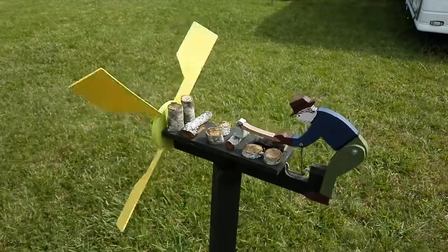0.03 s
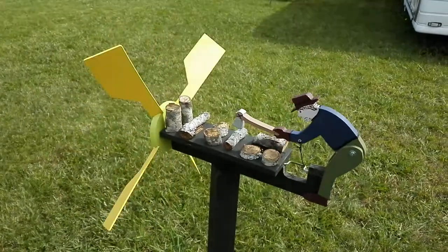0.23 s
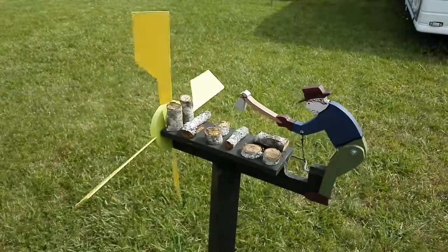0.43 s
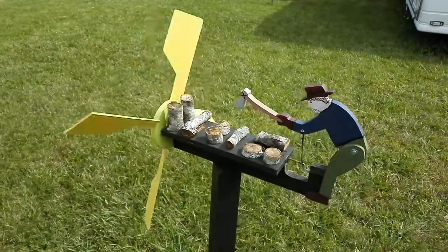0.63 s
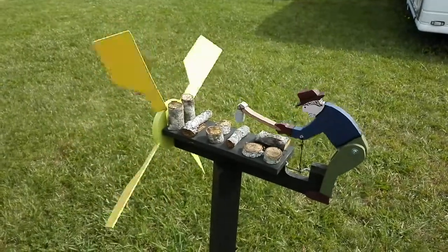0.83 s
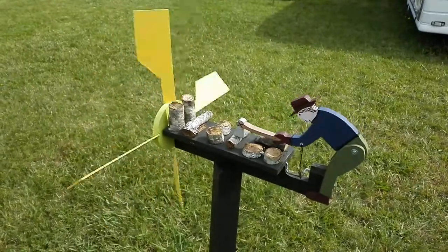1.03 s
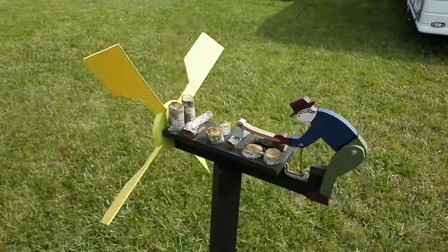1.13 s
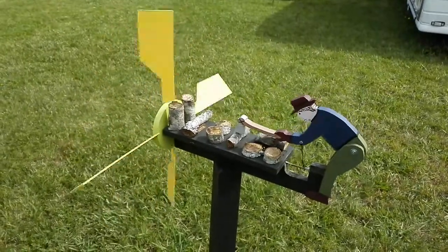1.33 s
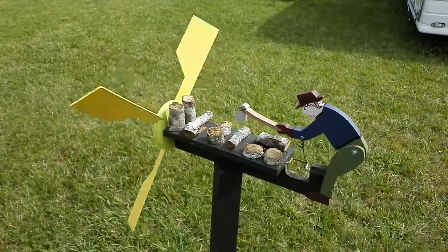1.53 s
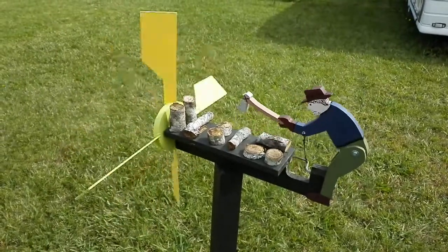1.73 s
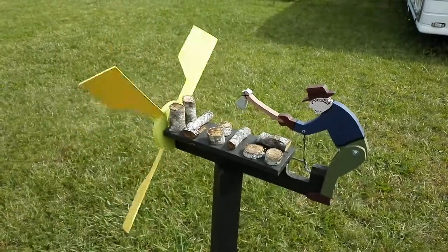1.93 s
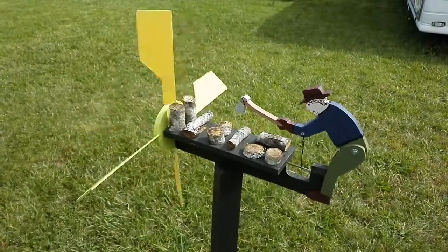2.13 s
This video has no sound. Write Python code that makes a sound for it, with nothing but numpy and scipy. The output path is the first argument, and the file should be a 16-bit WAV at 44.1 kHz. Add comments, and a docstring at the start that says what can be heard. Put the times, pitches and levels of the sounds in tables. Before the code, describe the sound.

Wind gusts rumble and thump on the microphone over faint crickets outdoors.

```python
"""Crickets trill steadily on a lawn, over a faint distant rush, soft hiss and a thin camera whine.
Right at the start a button on the camera snaps. Gusts then buffet its two microphone ports, each
port on its own, with a low rumble, a flutter of small eddies and sharp thumps from large ones.
About a second in, a hand rubs the case once; the gusts hit hardest around 1.65 s, then ease.
Faint creaking squeaks come and go throughout."""
import sys
import numpy as np
from scipy import signal
from scipy.fft import rfft, irfft
from scipy.io import wavfile
from scipy.ndimage import uniform_filter1d

SR = 44100
rng = np.random.default_rng(int(sys.argv[2]) if len(sys.argv) > 2 else 0)


def wav_out(sig):
    """Save sig, one row per channel (or a flat mono array), as 16-bit PCM at SR to the path in sys.argv[1]."""
    wavfile.write(sys.argv[1], SR, np.round(np.clip(np.atleast_2d(sig).T, -1, 1) * 32767).astype(np.int16))


N = 97020
T = np.arange(N) / SR
FREQ = np.maximum(np.fft.rfftfreq(N, 1 / SR), 1)


def undb(db):
    """Decibels to gain."""
    return 10 ** (np.asarray(db) / 20)


def unit(x):
    """Scale to rms 1."""
    return x / np.sqrt(np.mean(x ** 2))


def pan(db):
    """Left and right gains, with the left louder by db."""
    return undb(np.array([[db], [-db]]) / 2)


def swell(centre, width):
    """A bell-shaped fade in and out; centre and width (one sigma) in seconds."""
    return np.exp(-.5 * ((T - centre) / width) ** 2)


def strike(start_s, decay_s):
    """An instant attack with an exponential tail."""
    return (T >= start_s) * np.exp(-np.abs(T - start_s) / decay_s)


def noise(colour):
    """Noise shaped by rows of freq_hz, density_db (per Hz)."""
    hz, db = np.array(colour).T
    gain = undb(np.interp(np.log(FREQ), np.log(hz), db))
    return irfft(rfft(rng.standard_normal(N)) * gain, N) * np.sqrt(SR / 2)


def walk(rate_hz):
    """A smooth random drift of rms 1 that turns about rate_hz times a second."""
    return unit(irfft(rfft(rng.standard_normal(N)) * np.exp(-(FREQ / rate_hz) ** 2), N))


def rough_note(pitch_hz, width_hz):
    """A narrow band of noise around a pitch."""
    phase = 2 * np.pi * np.cumsum(pitch_hz * np.ones(N)) / SR
    return walk(width_hz) * np.sin(phase) + walk(width_hz) * np.cos(phase)


def even(x, window_s=0.042):
    """Level out the slow swells of a texture and keep its quick ones."""
    size = int(window_s * SR)
    power = uniform_filter1d(uniform_filter1d(x ** 2, size), size)
    return x / np.sqrt(np.abs(power) + 1e-18)


def wash(colour, flicker_db, rate_hz):
    """A flickering bed of noise with its own colour on each side."""
    colour = np.array(colour)
    return np.array([noise(colour[:, [0, side]]) * undb(flicker_db * walk(rate_hz)) for side in (1, 2)])


def air():
    """A faint, steady hiss."""
    # hiss colour: freq_hz, left_density_db, right_density_db
    colour = [(99.5, -61, -87), (394, -95, -104), (1130, -103, -104), (1700, -103, -104),
              (2700, -106, -108), (3600, -104, -108), (4500, -110, -112), (9900, -102, -103),
              (11400, -109, -109), (14300, -101, -115)]
    return wash(colour, flicker_db=-2.5, rate_hz=9.2)


def distant_rush():
    """A wide, far-off rush that slowly grows."""
    # colour at its loudest: freq_hz, density_db
    colour = [(250, -104), (450, -89.5), (600, -84.5), (820, -81.5), (1050, -102), (1300, -106),
              (1600, -101), (2200, -114), (4000, -122)]
    # slow fader ride: time_s, gain_db
    ride = [(0, -5), (.6, -5.5), (1.5, -1), (1.9, 0), (2.2, -1)]
    centre_share = 0.35  # of the power, heard alike on both sides
    centre = np.sqrt(centre_share) * noise(colour)
    sides = np.sqrt(1 - centre_share) * np.array([noise(colour), noise(colour)])
    return (centre + sides) * undb(np.interp(T, *np.array(ride).T))


def insect_chorus():
    """Far insects blur into a high shimmer."""
    # chorus colour: freq_hz, left_density_db, right_density_db
    colour = [(4250, -120, -130), (5067, -92.5, -112), (5590, -86, -108), (5940, -88, -105),
              (6400, -89, -95.5), (7100, -100.5, -93), (8000, -94, -86), (9030, -103, -85.5),
              (9720, -108, -99), (9430, -120, -115)]
    return wash(colour, flicker_db=1.33, rate_hz=15)


def crickets():
    """Near crickets: each wing stroke is a short, rough, gliding note."""
    # one cricket a row: first_stroke_s, strokes_per_s, pitch_hz, sweep_hz (per stroke cycle),
    # relative_level_db, left_offset_db
    singers = [(.06, 12.45, 7830, -600, -59, -14), (.075, 11.7, 8780, 1000, -59, -12),
               (.04, 11.65, 9050, -900, -61, -11), (.045, 12.1, 8500, 1600, -62, -12)]
    wander_cycles, width_cycles, trim_db = .03, .11, -3.5
    out = 0
    for first_s, strokes_per_s, pitch_hz, sweep_hz, level_db, left_db in singers:
        cycles = (T - first_s) * strokes_per_s + wander_cycles * walk(2)
        stroke = (cycles + .5) % 1 - .5  # zero at the peak of each stroke
        note = rough_note(pitch_hz + sweep_hz * stroke, width_hz=83)
        trill = unit(note * np.exp(-.5 * (stroke / width_cycles) ** 2))
        out = out + trill * undb(trim_db + level_db + np.array([[left_db], [0]]))
    return out


def squeaks():
    """Faint creaking squeaks, each a tone with a fast, uneven pitch wobble."""
    # squeaks: centre_s, pitch_hz, peak_db, width_s, left_minus_right_db
    notes = [(.060, 5560, -42, 0.0031, 14.5), (0.109, 2320, -65.5, 0.011, 12),
             (.123, 2840, -63, 0.0055, -8), (0.142, 2760, -63, 0.006, -7), (1.149, 5800, -52, .004, 13),
             (1.639, 6200, -53.5, 0.007, 6), (2.066, 3950, -66.5, 0.011, 7), (2.115, 3380, -72, .005, 0),
             (2.123, 1600, -70.5, 0.12, 10), (2.167, 3380, -64.5, 0.0054, 5)]
    wobble_share = .035
    out = 0
    for centre_s, pitch_hz, peak_db, width_s, pan_db in notes:
        phase = 2 * np.pi * np.cumsum(pitch_hz * (1 + wobble_share * walk(133))) / SR
        out = out + np.sin(phase) * swell(centre_s, width_s) * undb(peak_db) * pan(pan_db)
    return out


def camera_whine():
    """The camera's thin whine: steady, high sine tones."""
    # whine tones: pitch_hz, left_rms_db, right_rms_db
    tones = [(7064, -70, -76), (7123, -75, -83), (10655, -82, -92)]
    return sum(np.sqrt(2) * np.sin(2 * np.pi * pitch_hz * T) * undb([[left_db], [right_db]])
               for pitch_hz, left_db, right_db in tones)


def button_snap():
    """The button snaps: one tight, bright burst of noise."""
    # snap colour: freq_hz, relative_density_db
    colour = [(1000, -14), (3000, -10), (5000, -5), (7000, 0), (8300, -2), (9500, -14), (14000, -18)]
    burst = np.array([unit(noise(colour)) for side in (0, 1)])
    return burst * strike(start_s=.0204, decay_s=.0012) * undb(-20)


def case_clicks():
    """Lighter clicks and scuffs ring briefly in the camera body."""
    # touches on the case: start_s, relative_level_db, decay_s, left_minus_right_db
    touches = [(0.0119, -37, 0.0035, 6), (0.022, -35.5, 0.0064, 3), (0.04, -48, 0.013, 4),
               (1.105, -45.5, 0.0095, 7), (1.124, -49.5, 0.021, 4)]
    # colour of the case: freq_hz, relative_density_db
    colour = [(300, 12), (900, 4), (1500, 13), (2600, 3.5), (3800, 2.5), (5000, 4), (7000, 0.5),
              (9000, -19), (14000, -60)]
    out = 0
    for start_s, level_db, decay_s, pan_db in touches:
        sides = np.array([unit(noise(colour)) for side in (0, 1)])
        ring = 0.69 * sides + 0.61 * unit(noise(colour))
        out = out + ring * strike(start_s, decay_s) * undb(level_db) * pan(pan_db)
    return out


def hand_rub():
    """The hand slides over the case: a soft, hissy scrape leading into the scuffs."""
    scrape = np.array([rough_note(pitch_hz=6500, width_hz=520) for side in (0, 1)])
    return scrape * swell(centre=1.066, width=0.078) * undb(-55.5)


def rumble(level_db):
    """The low body of the wind at a port."""
    # rumble colour: freq_hz, relative_density_db
    colour = [(20, -61), (35, -35), (50, -5), (75, 4.5), (105, 8.5), (150, 0.5), (210, -5), (300, -20.5),
              (500, -76)]
    return even(noise(colour)) * undb(level_db)


def flutter(level_db):
    """A stream of small eddies; they get sharper as the wind gets harder."""
    eddies_per_s, spread_db, low_cut_hz = 330, 4, 151.5
    arrivals = rng.random(N) < eddies_per_s / SR
    sizes = undb(spread_db * rng.standard_normal(N))
    eddies = arrivals * sizes * rng.choice([-1, 1], N)
    spectrum = rfft(eddies) / np.sqrt(1 + (low_cut_hz / FREQ) ** 8)
    rolloff_hz = 260 * np.exp(0.0628 * (level_db + 26))  # 260 Hz at -26 dB, an octave up per 11 dB
    out = 0
    for band_hz in 70 * 2 ** (np.arange(18) / 3):  # third-octave bands
        band = np.maximum(1 - 3 * np.abs(np.log2(FREQ / band_hz)), 0)
        out = out + irfft(spectrum * band, N) * np.exp(-(band_hz / rolloff_hz) ** 1.236)
    return even(out) * undb(level_db)


def thumps(hits):
    """Each large eddy is one rounded pressure pulse; the port leaks its slowest part."""
    boost_db, leak_hz = 3.5, 66
    pressure = sum(peak * np.exp(-((T - centre_s) * 1000 / width_ms) ** 2)
                   for centre_s, peak, width_ms in hits)
    return undb(boost_db) * irfft(rfft(pressure) / (1 + (leak_hz / FREQ) ** 2), N)


def port_wind(gusts, hits):
    """Rumble, flutter and thumps at one port, all muffled by its opening."""
    time_s, rumble_db, flutter_db = np.array(gusts).T
    body = rumble(np.interp(T, time_s, rumble_db))
    buffets = flutter(np.interp(T, time_s, flutter_db)) + thumps(hits)
    muffle = signal.butter(4, 2250, fs=SR, output="sos")
    return signal.sosfiltfilt(muffle, body + buffets)


def wind():
    """Each microphone port catches its own gusts and eddies."""
    # gust strength at each port: time_s, rumble_db, flutter_db
    left_gusts = [(0.0, -66, -60), (0.05, -58, -54), (0.19, -50, -82), (0.25, -28, -37), (0.3, -36, -48),
                  (0.41, -36, -39.5), (0.45, -58, -57), (0.49, -25.5, -66), (0.52, -38.5, -39),
                  (0.56, -28, -34), (0.61, -33.5, -58), (0.68, -56, -52), (0.71, -30.5, -38),
                  (0.75, -19, -26.5), (0.79, -21, -30.5), (0.85, -19, -21), (0.93, -25, -32),
                  (0.96, -24.5, -24.5), (1.01, -26, -29.5), (1.1, -27.5, -21.5), (1.13, -25, -26),
                  (1.24, -26.5, -25), (1.32, -18, -18.5), (1.44, -19, -19), (1.47, -28, -33),
                  (1.5, -31, -26), (1.54, -39.5, -52.5), (1.63, -31.5, -50), (1.68, -12.5, -25),
                  (1.82, -34, -39.5), (1.85, -27, -30), (1.88, -30, -38), (1.91, -49, -44),
                  (2.01, -49, -46), (2.06, -29, -40), (2.19, -38, -41)]
    right_gusts = [(0.0, -49, -70), (0.05, -28, -35), (0.08, -37.5, -40.5), (0.16, -33.5, -68),
                   (0.18, -42, -60), (0.26, -16.5, -32.5), (0.28, -24.5, -35), (0.32, -23, -28),
                   (0.41, -35, -77), (0.55, -43.5, -60), (0.57, -27.5, -47), (0.6, -38.5, -55),
                   (0.68, -28, -39), (0.72, -29.5, -45), (0.85, -21.5, -32), (0.87, -34.5, -48),
                   (0.91, -32, -38.5), (0.94, -35, -57), (1.03, -19.5, -37), (1.08, -26, -29),
                   (1.19, -36, -40.5), (1.25, -27, -35), (1.28, -35, -45), (1.33, -29.5, -29),
                   (1.37, -29, -19), (1.4, -15.5, -20.5), (1.43, -24, -27), (1.54, -21, -28),
                   (1.58, -39.5, -35.5), (1.62, -12.5, -28), (1.81, -34.5, -47.5), (1.93, -25.5, -33.5),
                   (1.99, -35.5, -38.5), (2.04, -29.5, -35), (2.14, -39.5, -69), (2.19, -29.5, -54)]
    # large eddies hitting each port: centre_s, relative_peak_pressure, width_ms
    left_hits = [(.493, -0.15, 1.43), (.751, -0.27, 0.89), (0.817, -0.094, 0.41), (.840, -0.19, 0.43),
                 (0.851, -0.46, 1.4), (.861, -0.13, 0.6), (0.885, -0.22, 0.88), (.983, -0.16, 0.46),
                 (1.065, 0.067, 0.42), (1.096, 0.48, 0.88), (1.107, -0.21, 0.61), (1.148, 0.11, 0.44),
                 (1.215, -0.12, 0.42), (1.234, -0.1, 0.42), (1.254, -0.13, 0.44), (1.267, 0.28, 0.45),
                 (1.299, -0.18, 0.36), (1.325, -0.5, 0.97), (1.343, -0.094, 0.48), (1.364, -0.24, 0.29),
                 (1.402, 0.28, 1.04), (1.411, -0.54, 0.36), (1.435, -0.14, 0.27), (1.680, .32, 1.77)]
    right_hits = [(0.262, -0.044, 2.4), (0.318, 0.36, 2), (.321, -0.25, .66), (.324, -0.71, 1.14),
                  (.365, -0.21, 1.35), (.683, -0.29, 1.97), (1.378, -0.36, 0.54), (1.440, 0.33, 0.41),
                  (1.473, 0.51, 1.09), (1.474, -0.46, 0.68), (1.481, 0.064, 0.32), (1.622, -0.24, 1.47),
                  (1.659, 0.12, 0.58), (1.675, -0.36, 0.96), (1.922, -0.38, 1.72)]
    return np.array([port_wind(left_gusts, left_hits), port_wind(right_gusts, right_hits)])


def scene():
    """Wind over the lawn's steady bed, the camera's clicks, rub and whine, plus faint creaking squeaks."""
    gusts = wind()
    lawn = air() + insect_chorus() + crickets() + distant_rush()
    camera = button_snap() + case_clicks() + hand_rub() + camera_whine()
    return gusts + lawn + camera + squeaks()


def record(dry):
    """The camera cuts the deepest bass and the very top."""
    low_cut = signal.butter(3, 42, "high", fs=SR, output="sos")
    high_cut = signal.ellip(10, .2, 80, 14300, fs=SR, output="sos")
    return signal.sosfilt(high_cut, signal.sosfilt(low_cut, dry))


dry = scene()
out = record(dry)
wav_out(out)
```